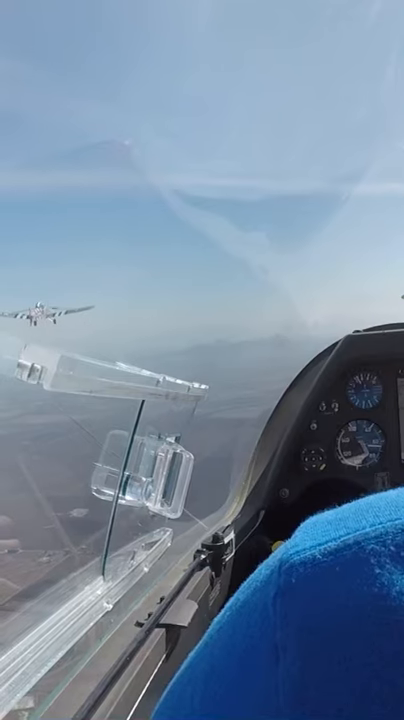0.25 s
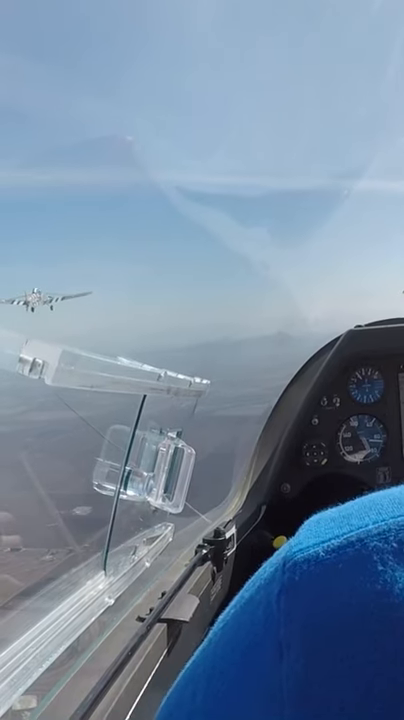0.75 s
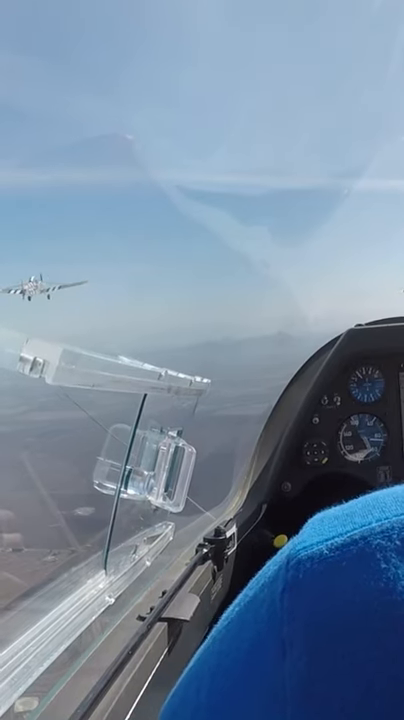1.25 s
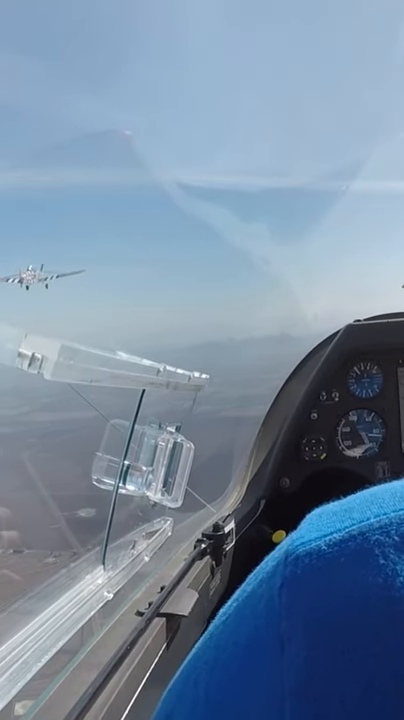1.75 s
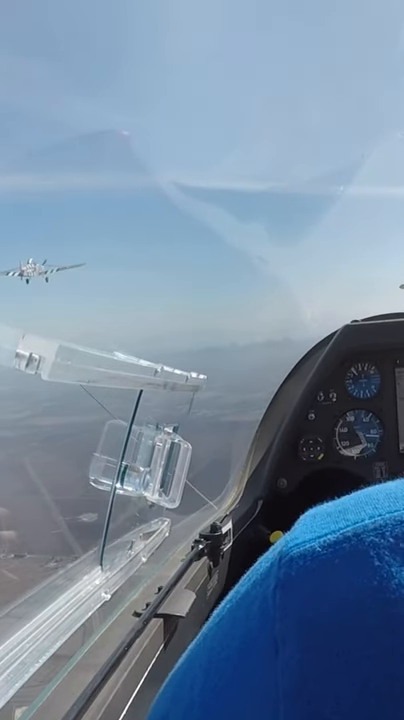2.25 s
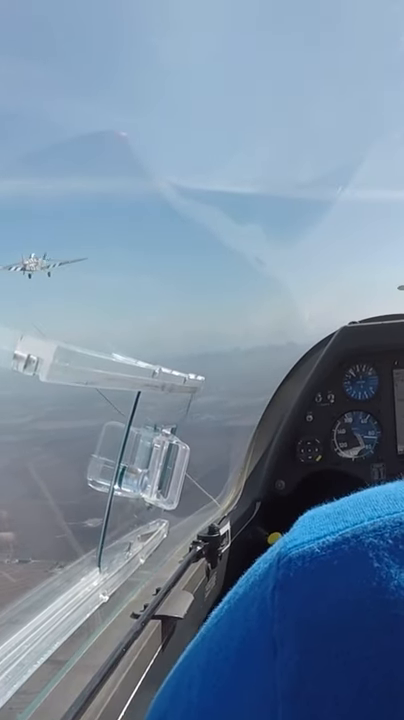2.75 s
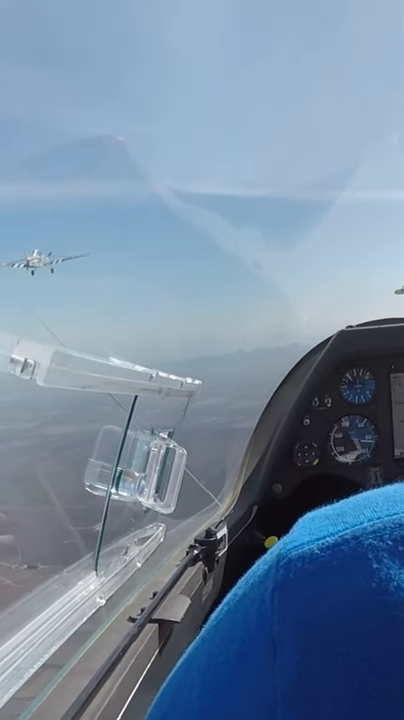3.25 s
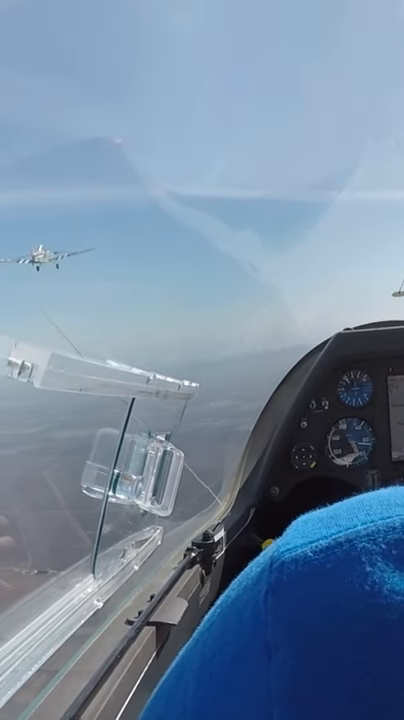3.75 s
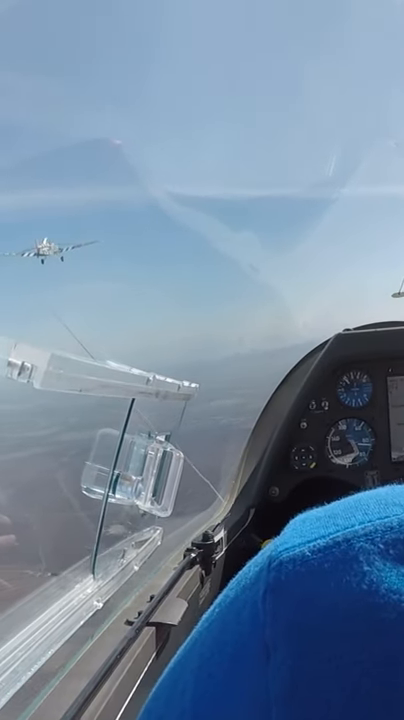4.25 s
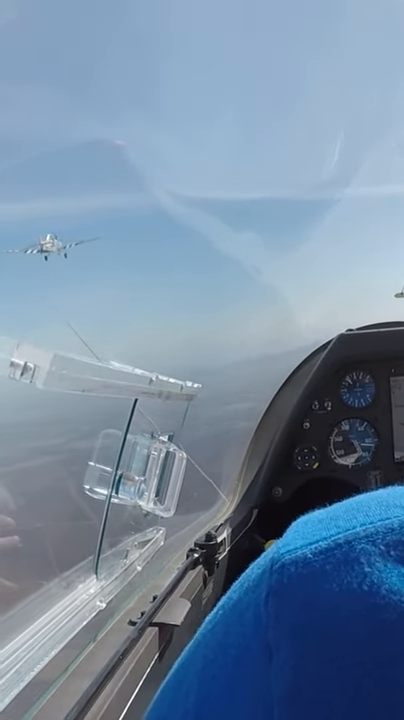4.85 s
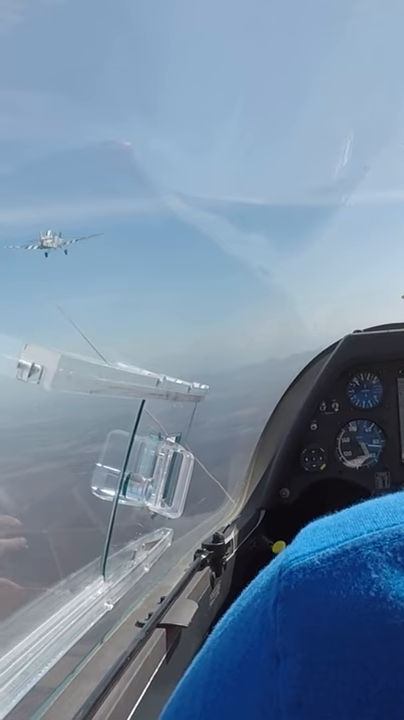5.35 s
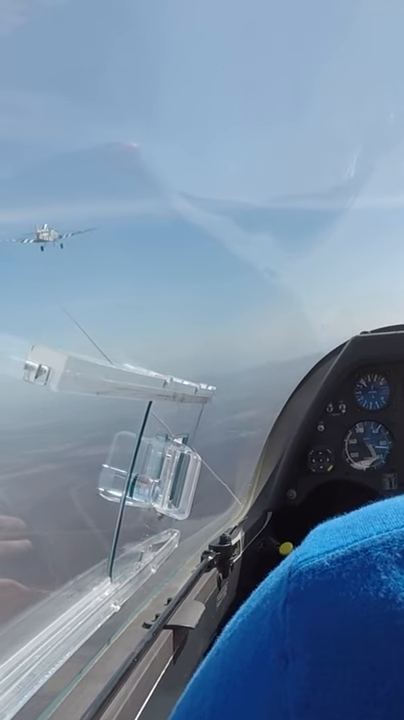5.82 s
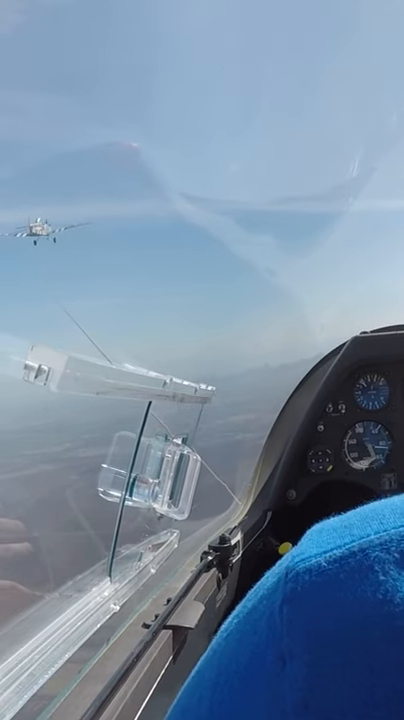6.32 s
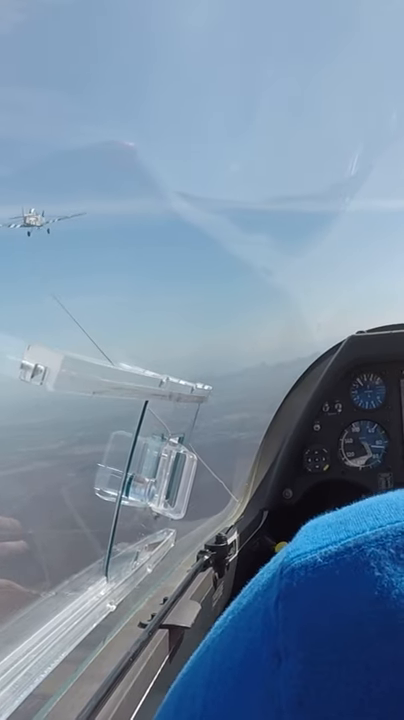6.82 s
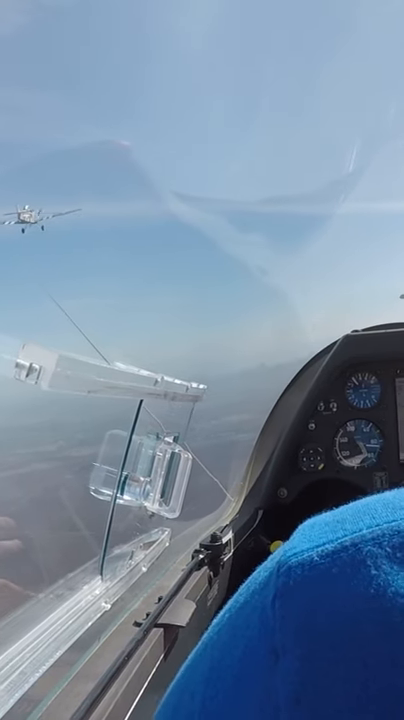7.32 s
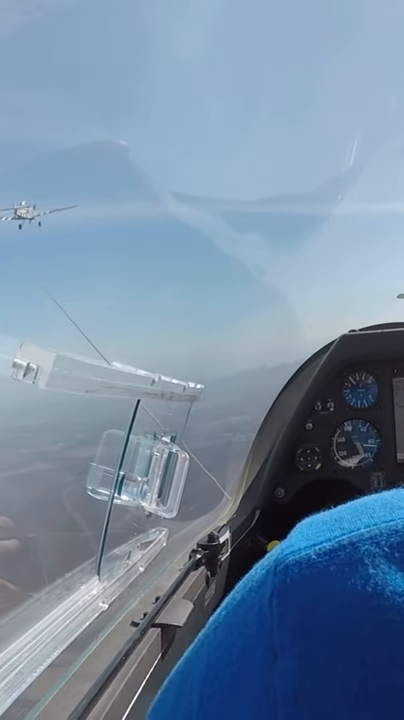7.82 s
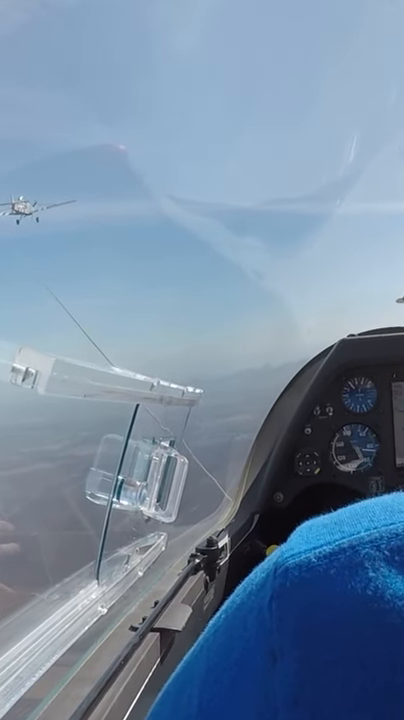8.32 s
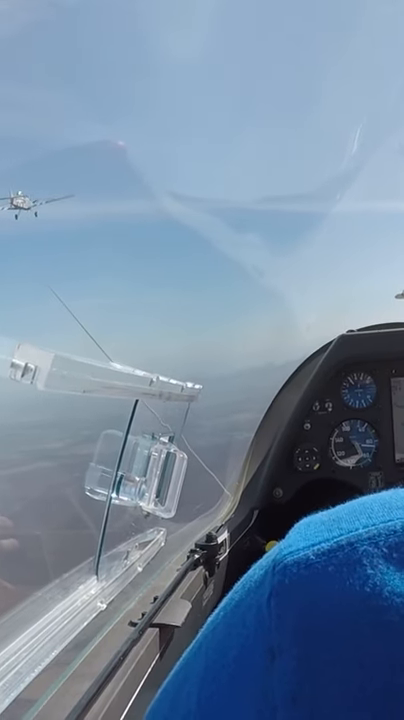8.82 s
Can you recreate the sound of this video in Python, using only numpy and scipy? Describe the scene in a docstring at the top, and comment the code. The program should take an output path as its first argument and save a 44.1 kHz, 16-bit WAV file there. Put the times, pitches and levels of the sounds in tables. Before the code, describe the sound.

Inside a small engineless aircraft, constant wind roar over the shell, low cabin booming and smooth hiss, broken by a few short hollow knocks.

```python
"""Inside a glider on tow

In the closed cockpit one airflow drives everything: filtered noise rushes over the shell and rumbles
in the fuselage, a brighter noise hisses in at the canopy vent, and narrow noise bands boom in a few
low cabin modes, which swell now and then. The flow slackens for a moment halfway through.
At times the airframe gives a dull knock: short contacts ring hull resonances and add a crack."""
import sys
import numpy as np
from scipy import signal
from scipy.fft import rfft, irfft
from scipy.io import wavfile
from scipy.ndimage import uniform_filter1d, minimum_filter1d

SR = 44100
rng = np.random.default_rng(int(sys.argv[2]) if len(sys.argv) > 2 else 0)


def dump(signal):
    """Clip the signal to [-1, 1] and save it as 16-bit WAV at the path in sys.argv[1]."""
    limited = np.clip(np.atleast_2d(signal).T, -1, 1)
    pcm = np.round(limited * 32767).astype(np.int16)
    wavfile.write(sys.argv[1], SR, pcm)


N = 400428

# The airflow over time. Each row: time in seconds, rush over the shell in dB, vent hiss in dB.
AIRFLOW = [(0, -27, -33.5), (1.1, -26.5, -33.5), (3.0, -26, -33.5), (4.25, -26, -33.5), (4.78, -27.5, -34),
           (5.09, -29.5, -37), (5.6, -26, -34), (6.15, -27.5, -34.5), (6.48, -26, -33.9),
           (6.95, -27.5, -34), (7.65, -25.8, -33.5), (8.05, -27.4, -33.5), (8.55, -27, -34),
           (9.08, -25.8, -33.5)]
# Broad rumble of the fuselage. Each row: frequency in Hz, density in dB per Hz at the mean flow.
FUSELAGE_RUMBLE = [(8, -66), (22, -58), (34, -38.5), (47, -45.5), (76, -38), (105, -43), (155, -40.5),
                   (205, -46.5), (310, -55), (450, -57.5), (700, -68), (2000, -110)]
# Low cabin modes. Each row: frequency in Hz, width in Hz, level between swells in dB at the mean flow.
CABIN_MODES = [(65, 6.9, -20), (96.76, 5.2, -20.5), (120.5, 9.3, -20), (137, 6.2, -24.5)]
# Rush through the canopy. Each row: frequency in Hz, density in dB per Hz for a rush of 0 dB.
RUSH_SPECTRUM = [(120, -48), (430, -31), (650, -35), (950, -30), (1300, -33), (1550, -36), (1820, -40.5),
                 (2080, -51), (3000, -73), (8000, -102)]
# Panel resonances in the rush. Each row: frequency in Hz, width in Hz, peak in dB per Hz
# for a rush of 0 dB.
PANEL_MODES = [(185, 12, -21), (224.4, 12.5, -17.5), (274.7, 25, -23.5), (368.5, 29, -26), (389, 14.4, -24),
               (515, 17.5, -25), (717, 20, -27.5), (725, 16, -28), (880.5, 21, -24.5), (1140, 17, -30.5),
               (1265, 10, -28), (1528, 18, -35.5)]
# Jet at the vent. Each row: frequency in Hz, density in dB per Hz for a hiss of 0 dB.
HISS_SPECTRUM = [(1000, -58), (2130, -45.5), (2310, -36.5), (2430, -35.5), (2540, -32), (2850, -36.5),
                 (4700, -36), (6400, -38), (7200, -49), (8800, -52.5), (10000, -60.5), (11400, -66),
                 (12500, -58), (15000, -66)]
# Reflections off canopy and panel. Each row: delay in milliseconds, gain as a signed factor.
CANOPY_REFLECTIONS = [(1.9, 0.02), (3.7, -0.057), (5.3, 0.031), (8.9, 0.065), (13.1, -0.092), (19.7, 0.091)]
# Airframe knocks. Each row: start in seconds, strength in dB, raw crack against that strength in dB.
AIRFRAME_KNOCKS = [(.595, -20, -8), (1.595, -12, -5), (3.615, -22, -6), (6.503, -14, -7), (7.724, -12, 2),
                   (7.735, -20, -9), (7.899, -17, -10), (7.928, -17, -5)]
# What a knock rings. Each row: frequency in Hz, level in dB, 60 dB decay time in seconds.
HULL_MODES = [(299, -9.5, 0.097), (363, -1, 0.057), (505, -10.5, 0.045), (600, -10.5, 0.1),
              (720, -7, 0.049), (866, -9, .06), (1100, -25, .04), (1450, -18, .03)]
# Buffets that swell one boom. Each row: time of the height in seconds, length in seconds, rise in dB,
# index of the cabin mode (rounded; one past the last mode moves nothing).
BUFFETS = [(1.4, .6, 2.5, 0.5), (1.757, .55, 6.5, 1), (2.84, 0.58, 6.5, 1), (3.18, .3, 4.5, 2),
           (3.597, 0.4, 5, 0.5), (4.553, 0.9, 3.5, 1), (4.86, 0.47, 9, 1), (5.1, 0.37, 8, 3),
           (5.745, 0.7, 8.5, 1), (6.103, 0.97, 3.5, 0), (6.74, 0.58, 9.5, 1), (6.997, .35, 5, 0),
           (8.252, 0.66, 4.5, 3.5), (8.346, 0.51, 8, 1), (8.922, 0.27, 8, 1), (8.947, 0.59, 2.5, 1)]

# dB of booming and of rumble for each dB of vent hiss, which follows the airspeed
BOOM_FOLLOWS, RUMBLE_FOLLOWS = 1.36, 1.0
BOOM_LAG_S = 0.32  # the booming answers the airflow a little late
CUTOFF_HZ = 15150


def from_db(db):
    """Decibels to gain."""
    return 10 ** (np.asarray(db) / 20)


def in_time(rows):
    """Each column of a curve, joined by straight lines, at every sample."""
    seconds, *columns = np.transpose(rows)
    t = np.arange(N) / SR
    return [np.interp(t, seconds, column) for column in columns]


def bins():
    """Frequency of every spectral bin in Hz, held to 1 or more."""
    return np.maximum(np.fft.rfftfreq(N, 1 / SR), 1)


def slope(points):
    """Gain per bin from (Hz, dB) points on a log-frequency axis."""
    hz, db = np.transpose(points)
    return from_db(np.interp(np.log(bins()), np.log(hz), db))


def resonance(hz, width_hz):
    """Gain per bin of a steep-sided resonance, 1 on top."""
    detune = (bins() ** 2 - hz ** 2) / (bins() * width_hz)
    return 1 / (1 + detune ** 2 / 2)


def turbulence(gain):
    """Random pressure whose density per root Hz is the given gain."""
    spectrum = rfft(rng.standard_normal(N)) * gain
    return irfft(spectrum, N) * np.sqrt(SR / 2)


def drift(rate_hz):
    """Slow random wander with a spread of 1."""
    slow = turbulence(1 / (1 + (bins() / rate_hz) ** 2))
    return (slow - slow.mean()) / slow.std()


def steadied(x, span_s):
    """Hold the level near rms 1 over the given span, leaving the faster flutter."""
    power = uniform_filter1d(x ** 2, max(int(span_s * SR), 2), mode="wrap")
    power = uniform_filter1d(power, max(int(span_s * SR / 2), 2), mode="wrap")
    return x / np.sqrt(power + 1e-18)


def fuselage_rumble(flow_db):
    """Broad low turbulence in the fuselage, rising and falling with the airflow."""
    return from_db(RUMBLE_FOLLOWS * flow_db) * turbulence(slope(FUSELAGE_RUMBLE))


def cabin_boom(flow_db):
    """Eddies drive the low modes of the cabin, each swelling and fading on its own."""
    t = np.arange(N) / SR
    drive_db = BOOM_FOLLOWS * np.interp(t - BOOM_LAG_S, t, flow_db)
    waver_db = 1.28
    boom = np.zeros(N)
    for index, (hz, width_hz, db) in enumerate(CABIN_MODES):
        mode = steadied(turbulence(resonance(hz, width_hz)), span_s=0.16)
        level_db = db + drive_db + swell_db(index) + waver_db * drift(rate_hz=6.1)
        boom += from_db(level_db) * mode
    return boom


def shell_rush(rush_db):
    """The boundary layer shakes the shell: a broad roar with panel resonances standing out of it."""
    power = slope(RUSH_SPECTRUM) ** 2
    for hz, width_hz, db in PANEL_MODES:
        power = power + (from_db(db) * resonance(hz, width_hz)) ** 2
    roar = turbulence(np.sqrt(power))
    even_roar = roar.std() * steadied(roar, span_s=0.32)
    gust_db = 0.5
    return from_db(rush_db + gust_db * drift(rate_hz=4.8)) * even_roar


def vent_hiss(hiss_db):
    """A smooth bright jet through the canopy vent, fluttering slightly."""
    flutter_db = 0.22
    return from_db(hiss_db + flutter_db * drift(rate_hz=13)) * turbulence(slope(HISS_SPECTRUM))


def canopy(x):
    """Close reflections ripple the spectrum and give the hiss its enclosed sound."""
    return x + sum(gain * np.roll(x, int(ms * SR / 1000)) for ms, gain in CANOPY_REFLECTIONS)


def ring(force, hz, t60):
    """A damped resonator: a unit click sets a sine of height 1 ringing."""
    radius = from_db(-60 / (t60 * SR))
    step = 2 * np.pi * hz / SR
    return signal.lfilter([0, np.sin(step)], [1, -2 * radius * np.cos(step), radius ** 2], force + 1e-18)


def knocks(rattle_s=0.0053, rattle=0.76, crack_s=0.0046, crack_hz=1300, top_hz=4000):
    """Each knock is one firm contact and a short chatter; they ring the hull and give off a dull crack."""
    t = np.arange(SR // 16) / SR
    force, crack = np.zeros(N), np.zeros(N)
    contact = t == 0
    for start_s, db, crack_db in AIRFRAME_KNOCKS:
        chatter, grit = rng.standard_normal((2, len(t)))
        chatter = chatter * np.exp(-t / rattle_s)
        chatter = rattle * chatter / np.linalg.norm(chatter)
        at = int(start_s * SR)
        force[at:at + len(t)] += from_db(db) * (contact + chatter)
        crack[at:at + len(t)] += from_db(db + crack_db) * grit * np.exp(-t / crack_s)
    # neighbouring modes ring in opposite polarity
    rings = sum((-1) ** k * from_db(db) * ring(force, hz, t60)
                for k, (hz, db, t60) in enumerate(HULL_MODES))
    crack_band = signal.butter(1, [400, crack_hz], "band", fs=SR, output="sos")
    crack = signal.sosfilt(crack_band, crack)
    # the composite shell passes little treble
    shell = signal.butter(4, top_hz, fs=SR, output="sos")
    return signal.sosfilt(shell, rings + 2 * crack)


def swell_db(index):
    """Each buffet lifts its boom in one smooth arch, in dB."""
    t = np.arange(N) / SR
    lift_db = np.zeros(N)
    for height_s, length_s, rise_db, boom in BUFFETS:
        if round(boom) == index:
            phase = np.clip((t - height_s) / length_s, -0.5, 0.5)
            lift_db += rise_db * np.cos(np.pi * phase)
    return lift_db


def limited(x, ceiling_db=-6.5, hold_s=0.0074):
    """A limiter eases the gain down around the largest swings."""
    size = max(int(hold_s * SR), 2)
    gain = np.minimum(1, from_db(ceiling_db) / (np.abs(x) + 1e-9))
    return x * uniform_filter1d(minimum_filter1d(gain, size), size)


def scene():
    """Everything as heard from the seat."""
    rush_db, hiss_db = in_time(AIRFLOW)
    flow_db = hiss_db - hiss_db.mean()
    air = fuselage_rumble(flow_db) + cabin_boom(flow_db) + shell_rush(rush_db)
    return (air + canopy(vent_hiss(hiss_db)) + knocks())[None]


def record(dry):
    """The bass is limited on its own, then the top is cut steeply."""
    bass = signal.sosfiltfilt(signal.butter(2, 300, fs=SR, output="sos"), dry)
    held = dry - bass + limited(bass)
    top_cut = signal.ellip(12, 0.1, 90, CUTOFF_HZ, fs=SR, output="sos")
    return signal.sosfilt(top_cut, held)


dry = scene()
out = record(dry)
dump(out)
```